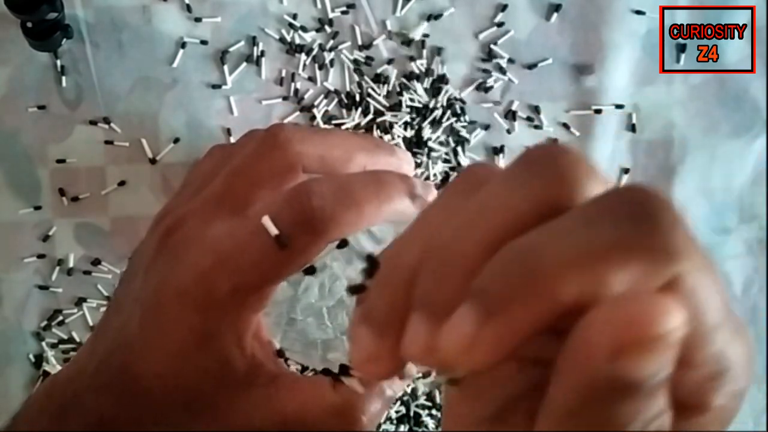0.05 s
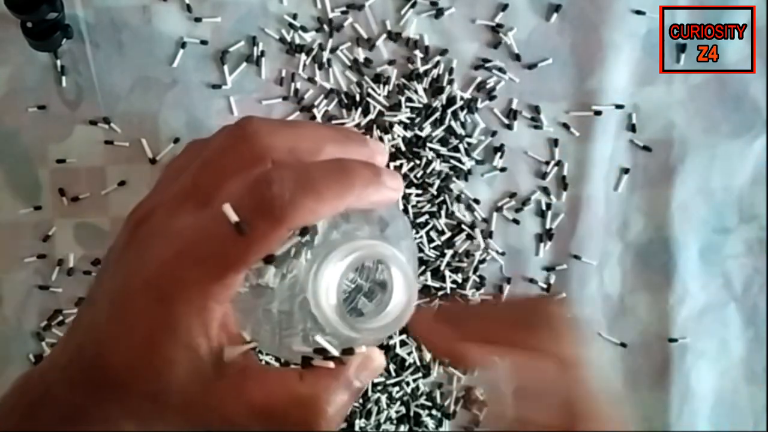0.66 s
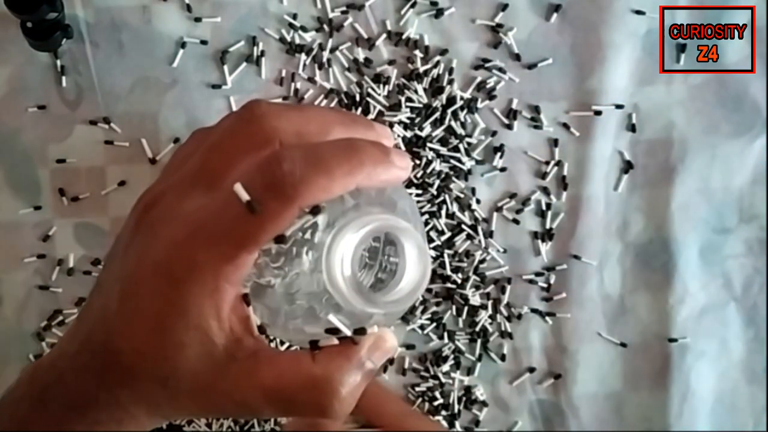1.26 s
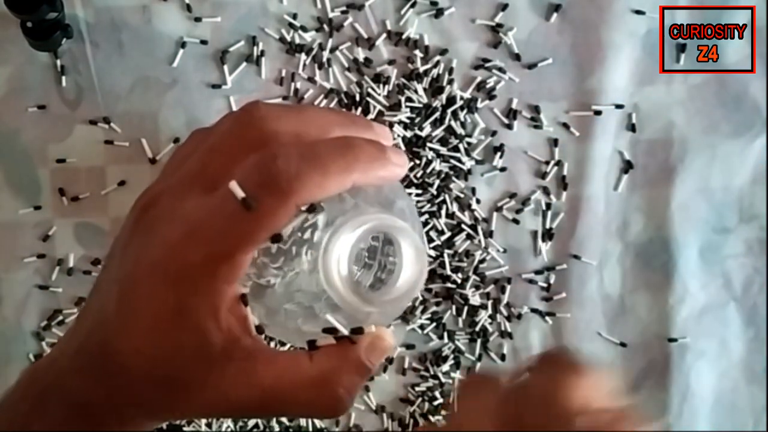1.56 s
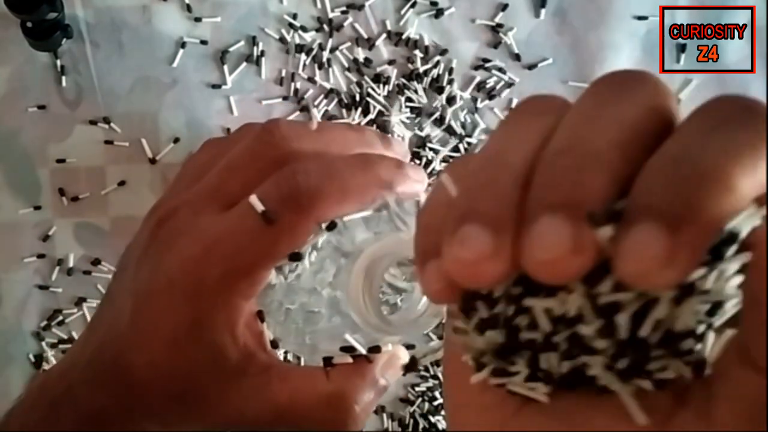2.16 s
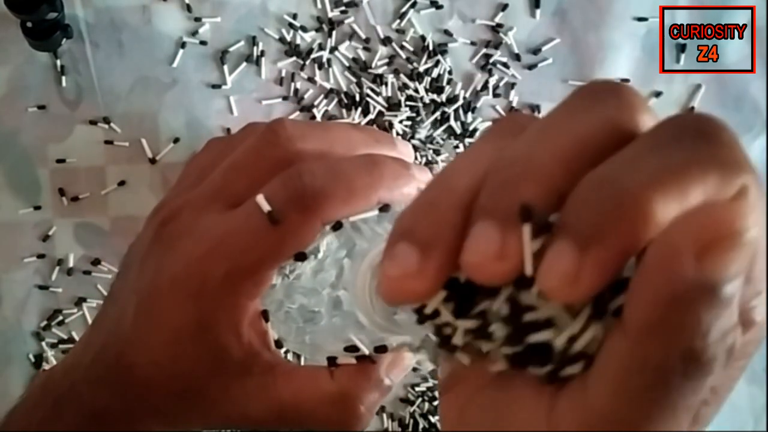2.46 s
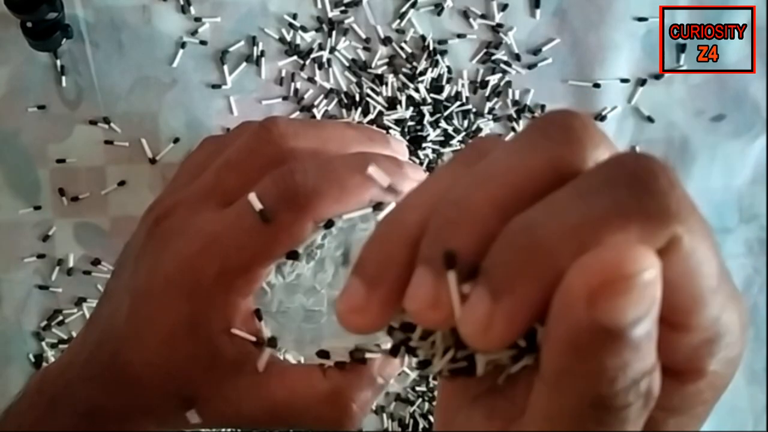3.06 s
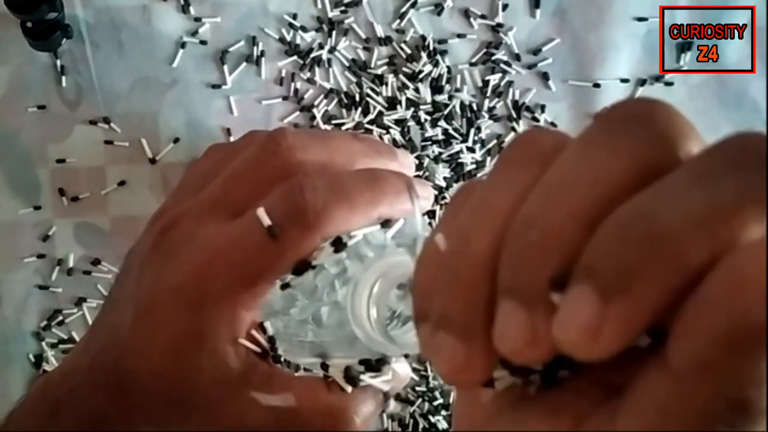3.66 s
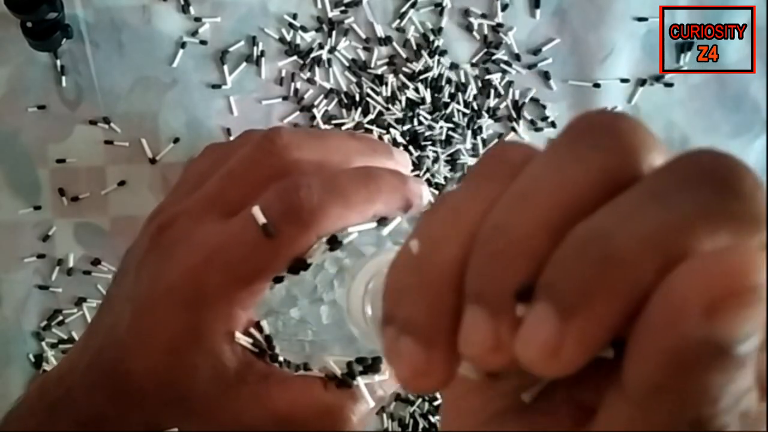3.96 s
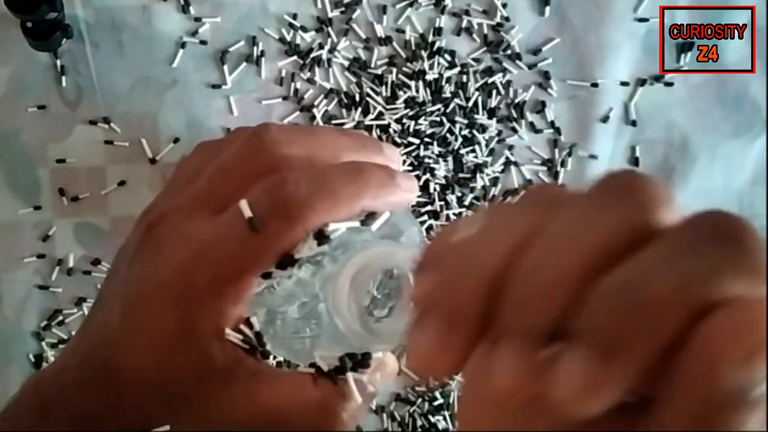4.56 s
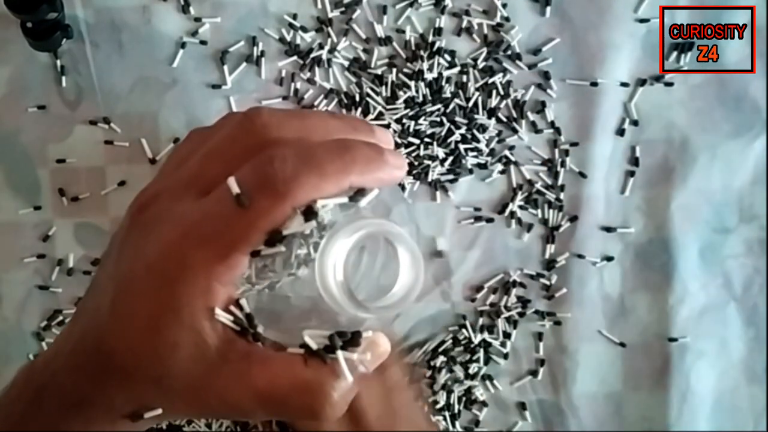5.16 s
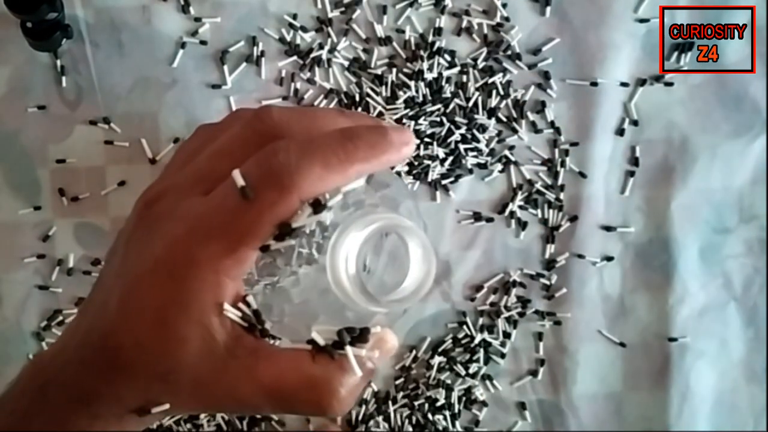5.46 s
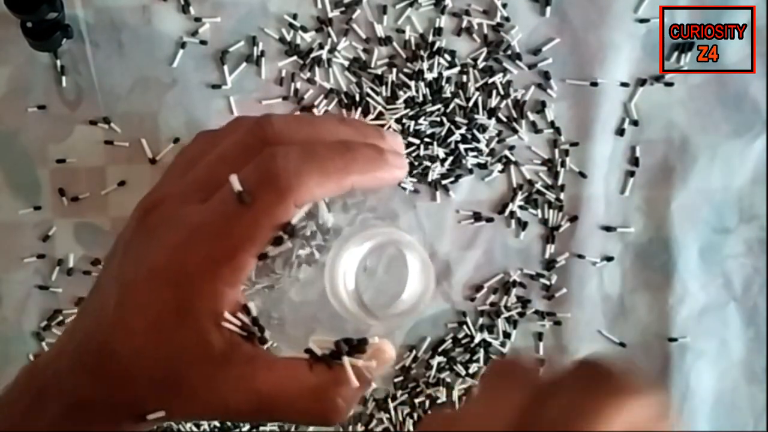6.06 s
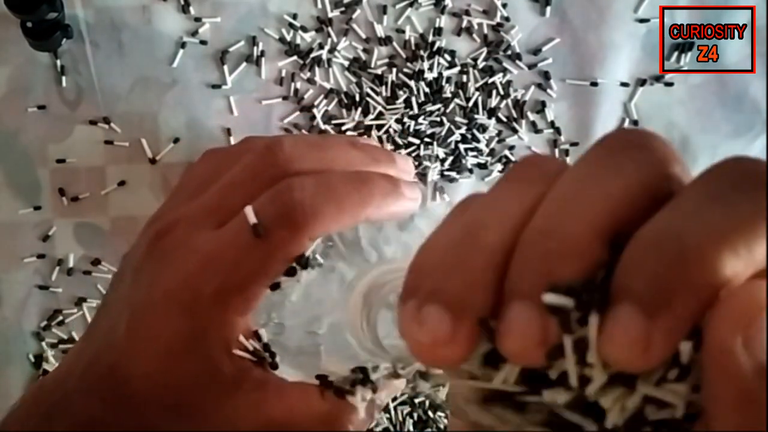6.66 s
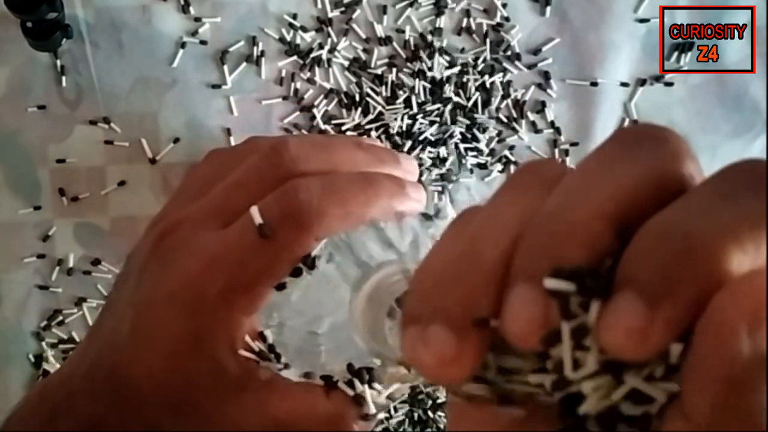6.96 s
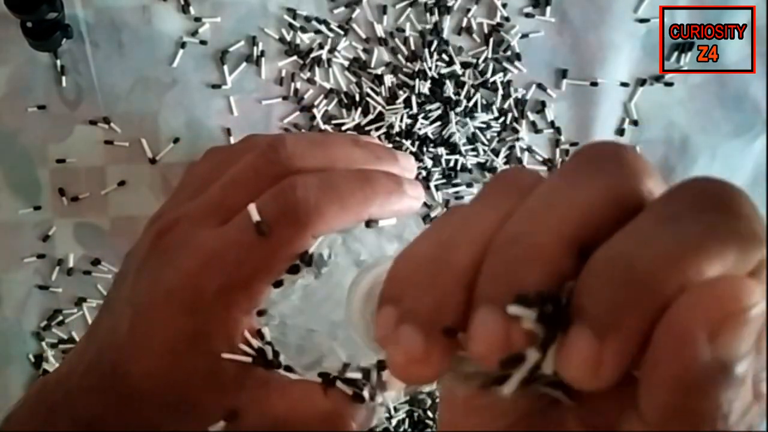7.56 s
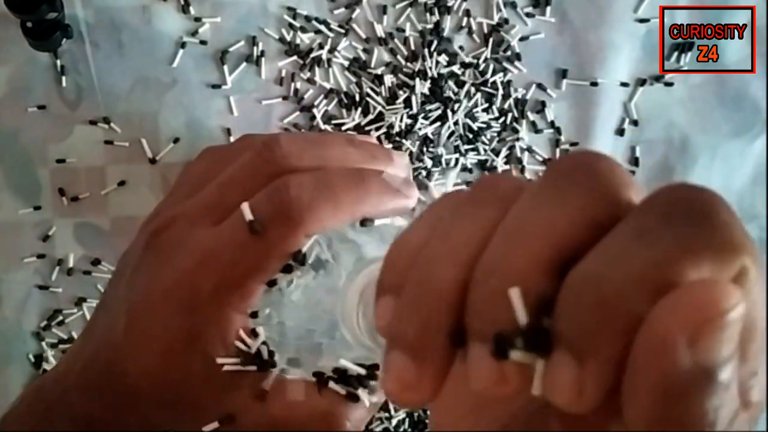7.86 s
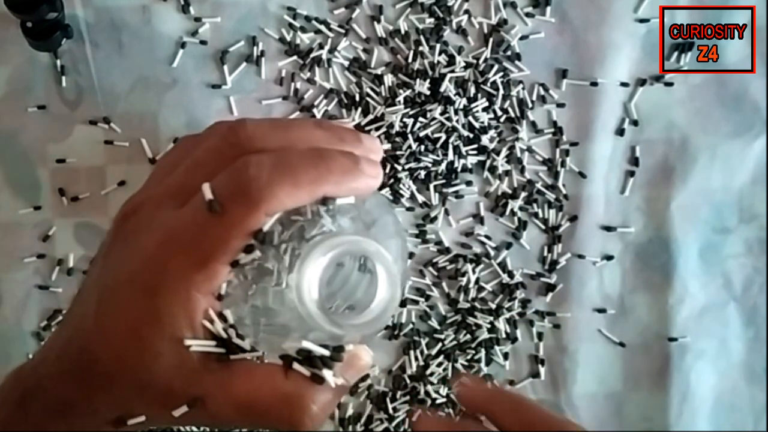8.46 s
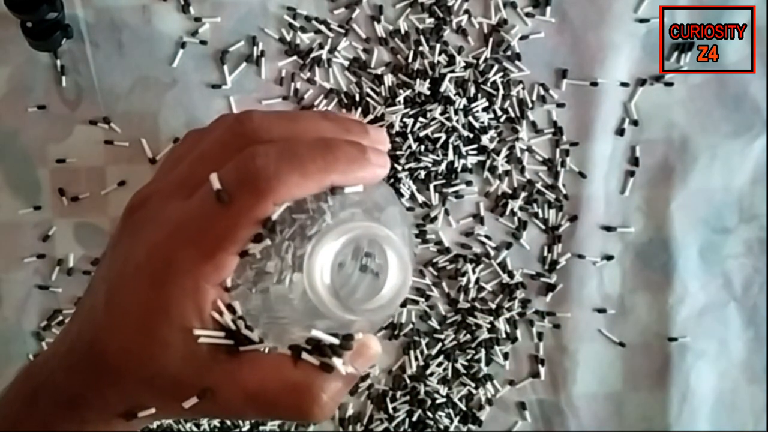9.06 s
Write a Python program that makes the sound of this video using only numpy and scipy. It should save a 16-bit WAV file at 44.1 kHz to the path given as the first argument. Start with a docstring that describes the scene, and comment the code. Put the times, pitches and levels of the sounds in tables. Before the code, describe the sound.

Small wooden matchsticks are already pouring into a plastic bottle, a bright, dense rattle with a faint hollow ring, thinning to stray ticks by about 0.7 seconds. Around 1 second fingers rustle through a heap of sticks on cloth and the hand softly bumps the table. After a lull with a few clicks, a second handful rattles down in uneven gushes from 2 seconds, stalls just after 3, and resumes from 3.6 to 4.6. Near 5 seconds comes another rustling scoop with a low thump, then a faint grating as the bottle shifts. Loose sticks crackle around 6 seconds, and a third pour runs from 6.6 to 8. The last sticks and a small clump click down by 8.5 seconds, leaving faint room hiss. The contacts are close and crisp, with the short echo of a bare room.

```python
"""A table in a bare, live room: a hand scoops cut matchsticks from a heap on a cloth and pours three
handfuls into a plastic bottle. Hundreds of tiny wooden contacts a second rattle on the plastic and
ring its walls; stray sticks tick and clumps drop in. Fingers rustle through the heap, the hand bumps
the table, the bottle drags with a low grating, and the room answers the sticks."""
import sys
import numpy as np
from scipy import signal
from scipy.fft import rfft, irfft, next_fast_len
from scipy.io import wavfile
from scipy.ndimage import uniform_filter1d, map_coordinates

SR = 44100
rng = np.random.default_rng(int(sys.argv[2]) if len(sys.argv) > 2 else 0)


def digitize_waveform(pressure):
    """Quantize a signal to 16-bit integers and store it at the path in sys.argv[1].

    Rows of a 2-D input are taken as channels; values are limited to [-1, 1].
    """
    field = np.atleast_2d(pressure).T
    bounded = np.clip(field, -1, 1)
    quanta = np.round(bounded * 32767).astype(np.int16)
    wavfile.write(sys.argv[1], SR, quanta)


N = 411446

# the fist is open and sticks stream out; the second handful stalls halfway: t/s, length/s, level/dB
POUR_CUES = [(-.25, 0.58, -27), (2.06, 1.015, -31.5), (3.6, 0.92, -32), (6.58, 1.42, -31)]
# the fingers shift and let an extra gush through: t/s, length/s, level/dB
GUSH_CUES = [(-.03, 0.027, -22.5), (.12, 0.051, -26), (.447, 0.033, -34.5), (2.105, 0.11, -35.5),
             (2.19, 0.026, -34.5), (2.25, 0.25, -32), (2.61, 0.025, -27), (2.745, 0.064, -33),
             (2.8, 0.025, -27.5), (2.85, 0.081, -27), (3.18, 0.17, -37.5), (3.385, 0.11, -40),
             (3.525, 0.22, -34), (3.724, 0.094, -25.5), (3.945, 0.04, -30), (4.14, 0.11, -32.5),
             (4.262, 0.024, -28), (4.397, 0.017, -24), (4.425, 0.018, -35), (6.615, 0.033, -38),
             (6.642, 0.033, -34), (6.692, 0.022, -30), (6.795, 0.061, -25.5), (6.92, 0.094, -29),
             (7.87, 0.033, -28.5), (7.025, 0.054, -26.5), (7.12, 0.083, -27), (7.332, 0.012, -26),
             (7.568, 0.023, -28), (7.7, 0.21, -29.5)]
# a hand leans on the bottle or the table: t/s, length/s, level/dB
PRESS_CUES = [(.02, 0.12, -49), (.3, 0.38, -59), (.91, 0.17, -56.5), (2.38, 0.18, -55), (2.74, 0.42, -53.5),
              (3.76, 0.2, -66), (4.4, 0.13, -57.5), (4.87, .12, -53), (5.02, 0.13, -53), (5.55, 0.059, -52)]
# stray sticks strike the plastic or each other: t/s, level/dB, centre f/Hz
TICK_CUES = [(0.1686, -28, 6700), (.3301, -34, 6250), (0.4486, -25, 5700), (0.5088, -34, 7700),
             (.5933, -32.5, 8200), (0.659, -37.5, 10100), (0.6843, -36.5, 7700), (0.8423, -38, 4000),
             (0.852, -40, 5600), (0.8582, -43, 4600), (0.9083, -37, 7000), (1.4852, -43, 8500),
             (1.517, -46, 7800), (1.696, -52, 4970), (1.7193, -32.5, 12100), (1.7331, -47, 10000),
             (1.735, -40, 9900), (1.8732, -31.5, 9900), (1.9075, -33, 9100), (1.9622, -36, 6500),
             (1.9669, -35, 5450), (2.0445, -38, 7850), (2.0813, -37, 5800), (2.1018, -25.5, 7830),
             (2.146, -27, 9000), (2.206, -30, 7600), (2.3166, -29, 7200), (2.569, -24.5, 10160),
             (2.6359, -32, 6860), (2.7714, -27, 7800), (3.0689, -33, 5950), (3.14, -34, 5560),
             (3.2276, -30, 6050), (3.2376, -28, 6800), (3.2477, -32, 7500), (3.3328, -37, 5900),
             (3.3956, -28, 6840), (3.4473, -33.5, 5950), (3.495, -37, 6400), (3.5401, -28.5, 6940),
             (3.558, -28, 6150), (3.6272, -36, 6400), (3.69, -31.5, 5070), (3.735, -23, 6350),
             (3.8982, -26, 5160), (3.9549, -31, 7300), (4.1182, -30, 6850), (4.1986, -30, 6670),
             (4.209, -26, 7800), (4.2675, -34, 7500), (4.278, -38, 8000), (4.3863, -25, 7100),
             (4.4, -26, 7300), (4.407, -24, 5930), (4.428, -28, 6300), (4.458, -24, 8600),
             (4.5433, -32.5, 7700), (4.554, -30, 7500), (4.6018, -26.5, 9330), (4.653, -40, 6650),
             (4.6775, -42, 5600), (4.8513, -39, 9200), (4.864, -40.5, 8250), (4.8857, -48, 5000),
             (4.9546, -36, 7700), (5.7922, -38.5, 6500), (5.867, -42, 7100), (6.0484, -45, 7900),
             (6.12, -47, 9000), (6.1274, -37, 8400), (6.1505, -38, 7600), (6.2238, -33, 7100),
             (6.2646, -34, 6460), (6.3278, -35.5, 8000), (6.3567, -37, 8540), (6.3818, -28, 6600),
             (6.4558, -33, 8600), (6.4899, -29, 6000), (6.5689, -37.5, 4500), (6.6104, -37, 5900),
             (6.644, -31, 6500), (6.6666, -34, 5840), (6.7015, -25, 7600), (6.769, -25, 6760),
             (6.7986, -25, 6940), (7.144, -27, 7500), (7.342, -26, 7000), (7.437, -31, 6400),
             (7.494, -27, 7600), (7.553, -27, 6900), (7.6797, -24, 8400), (7.682, -32, 7600),
             (7.7213, -23, 7500), (8.1177, -29, 7600), (8.179, -33, 9800), (8.2456, -52, 7300),
             (8.2706, -38, 9470), (8.399, -31, 7660), (8.4013, -27.5, 7550), (8.4353, -36, 8900)]
# clumps of sticks land together: t/s, level/dB, spread/s
CLUMP_CUES = [(.449, -41, .012), (.853, -49, .012), (1.9665, -38, 0.01), (2.101, -38, 0.0096),
              (3.3975, -34, .008), (3.5395, -42, 0.0095), (3.734, -37, .016), (4.399, -36, .025),
              (5.791, -50, .009), (6.224, -46, 0.014), (6.3835, -33.5, .008), (6.798, -28, 0.011),
              (8.401, -40, 0.011)]
# loose sticks shift in the fist or drop back on the heap: t/s, length/s, level/dB
SHIFT_CUES = [(.64, 0.062, -43.5), (1.9, 0.045, -53), (1.962, .13, -47.5), (6.125, .08, -52),
              (6.225, 0.13, -45.5), (6.385, 0.42, -44.5), (8.05, 0.12, -40.5), (8.397, 0.037, -34)]
# finger strokes through the heap: t/s, length/s, rustle level/dB, cloth level/dB
SCOOP_CUES = [(0.844, 0.22, -40, -52), (1.3, 0.5, -58.5, -65.5), (1.46, 0.023, -47, -87),
              (1.848, 0.045, -46, -59.5), (4.822, 0.028, -43, -51.5), (4.892, 0.051, -37, -51),
              (5.048, 0.22, -38, -55), (5.359, 0.22, -47, -55.5), (5.79, 0.06, -46, -60),
              (6.09, 0.21, -57, -61), (8.81, 0.1, -64, -85)]
# the hand bumps the table: t/s, level/dB, f/Hz, t60/s
BUMP_CUES = [(0.894, -42, 64.4, 0.39), (1.02, -51, 62, .55), (5.04, -39, 59.7, 0.5), (5.3, -56, 57, 1.2),
             (5.62, -53, 57.7, 0.35)]
# the bottle shifts on the cloth: t/s, length/s, level/dB
SLIDE_CUES = [(.92, 0.28, -67), (4.88, 0.1, -67), (5.53, 0.067, -58), (5.7, 0.098, -76)]

# sticks on plastic: f/Hz, level/dB
RATTLE_EQ = [(100, -12.5), (250, -11), (450, -14), (620, -8), (1000, -5), (1500, -6), (2150, -3.5),
             (2900, -4), (3700, -3.5), (4600, 0.3), (5700, -3), (7200, -0.8), (9400, -1.9), (11000, -7.5),
             (14500, -12.5), (16000, -26)]
# contacts on the bottle's rim: f/Hz, level/dB
RIM_EQ = [(300, -18.5), (1500, -5.5), (2600, 1), (4500, -4), (8500, 1.5), (11500, -7), (15500, -5)]
# room tone and hiss: f/Hz, level/dB
ROOM_TONE_EQ = [(15, -34), (25, -47), (53, 1.5), (102, -3.5), (120, -8.5), (190, -4), (217, -7),
                (373, -9.5), (405, -9), (1290, -17.5), (8830, -21.5), (14400, -26), (16000, -16.5)]
# one sharp contact: f/Hz, level/dB
TAP_EQ = [(200, -1), (600, 10.5), (1400, -0.5), (2500, 3), (5000, -0.5), (10000, -1.5), (15500, -10.5)]
# sticks against sticks: f/Hz, level/dB
LOOSE_EQ = [(200, -9.5), (700, -6), (1800, -7.5), (2600, -1.5), (4200, 0), (6000, -2), (9000, -0.5),
            (12000, -5), (15500, -14)]
# sticks on cloth: f/Hz, level/dB
HEAP_EQ = [(100, -9), (250, -5), (430, -7.5), (620, -1), (1000, -4), (1700, -5.5), (4500, -2), (9000, -2),
           (13000, -8.5), (16000, -19)]
# the bottle's base on the cloth: f/Hz, level/dB
GRATING_EQ = [(40, -20), (110, 6), (170, 7), (290, -3), (420, -21), (1000, -40), (4000, -90)]
# tone of the direct path: f/Hz, level/dB
DIRECT_EQ = [(400, -11), (1500, -3), (4200, 0.5), (8000, -1), (14000, 2)]
# resonances of the bottle's thin walls and the air inside: f/Hz, width/Hz, level/dB
BOTTLE_MODES = [(326.6, 18, 4.5), (421, 25, 1.5), (500, 37, 4), (591, 17, 6.5), (642, 26, 2),
                (768, 52, 2.5), (842, 29, -2), (902, 26, -1), (1033, 50, 0), (1235, 43, 4.5),
                (1380, 61, -10), (1713, 12, -1), (2146, 48, 7.5)]
# low resonances of bottle, table and room: f/Hz, width/Hz, level/dB
LOW_MODES = [(59, 20, -7), (133.9, 3.7, 12), (189.7, 5.6, 1), (237, 5.8, -6), (323, 5.4, 1)]
# the room's reverb time: f/Hz, t60/s
ROOM_DECAY = [(200, 1), (1000, 0.82), (4000, 0.51), (8000, 0.38), (14000, 0.41)]
# left-right likeness of diffuse sound: f/Hz, correlation
COHERENCE = [(150, 0.79), (350, 0.77), (700, 0.14), (1500, 0)]

OVERTONE = 2.76  # a free stick's second bending mode over its first
STICK_T60_S = 0.013  # ring of a stick that lies against others
SNAP_ATTACK_S, SNAP_RELEASE_DB_PER_S = 0.0011, 291  # fast envelope of gushes and shifts


def amp(db):
    return 10 ** (np.asarray(db) / 20)


def unit(x):
    return x / np.sqrt(np.mean(x ** 2) + 1e-20)


def curve(points, hz):
    """Read (f/Hz, value) points along a log frequency axis."""
    f, value = np.transpose(points)
    return np.interp(np.log(hz + 1), np.log(f + 1), value)


def filtered(x, response):
    """Apply a complex frequency response."""
    n = x.shape[-1]
    padded = next_fast_len(n + 8192, True)
    return irfft(rfft(x, padded) * response(np.fft.rfftfreq(padded, 1 / SR)), padded)[..., :n]


def eq(x, tone):
    """Colour x with an EQ curve."""
    return filtered(x, lambda hz: amp(curve(tone, hz)))


def crossover(x, tone, edge_hz):
    """EQ a stream and split it into a bright and a dull band, each of rms 1."""
    low = lambda hz: 1 / (1 + (hz / edge_hz) ** 6)
    bright, dull = filtered(x, lambda hz: amp(curve(tone, hz)) * np.array([1 - low(hz), low(hz)]))
    return unit(bright), unit(dull)


def resonances(modes, f):
    """Complex response of a bank of resonators."""
    return sum(amp(db) * width * f / (width * f - 1j * (hz * hz - f * f)) for hz, width, db in modes)


def diffuse(a, b, hz):
    """Spread two unrelated spectra in stereo: narrow in the bass, wide above."""
    angle = np.arccos(np.clip(curve(COHERENCE, hz), -1, 1)) / 2
    mid, side = np.cos(angle) * a, np.sin(angle) * b
    return np.array([mid + side, mid - side])


def placed(times, grains):
    """Mix the rows of grains, each starting at its time."""
    at = (np.abs(times) * SR).astype(int)[:, None] + np.arange(grains.shape[1])
    return np.bincount(at.ravel(), grains.ravel(), N)[:N]


def swells(cues, attack_s, release_db_per_s):
    """Envelope of (t/s, length/s, level/dB) cues: each rises, holds and dies away; powers add."""
    t = np.arange(0, N + 64, 64) / SR
    start, length, db = np.transpose(cues)[:, :, None]
    attack = np.clip((t - start) / attack_s, 0, 1)
    release = amp(db - release_db_per_s * np.maximum(t - start - length, 0))
    return np.interp(np.arange(N) / SR, t, np.linalg.norm(attack * release, axis=0))


def cracks(centre_hz, t60, octaves, size=256):
    """Dry wooden contacts of equal energy: brief noise bursts, each a broad band around its centre."""
    decay = np.roll(np.exp(-np.log(1000) * np.arange(size) / SR / t60), size // 16)
    spectrum = rfft(rng.standard_normal((len(centre_hz), size)) * decay)
    flattened = spectrum / np.abs(spectrum) ** 0.8
    distance = np.log2((np.fft.rfftfreq(size, 1 / SR) + 1) / centre_hz[:, None])
    burst = irfft(flattened * np.exp(-0.5 * (distance / octaves) ** 2))
    return burst / np.linalg.norm(burst, axis=1, keepdims=True)


def stick_rings(hz, overtone_db, size=1024):
    """Struck sticks of equal energy: each rings briefly at its pitch and its overtone."""
    t = np.arange(size) / SR
    phase = 2 * np.pi * hz[:, None] * t
    fade = np.exp(-np.log(1000) * t / STICK_T60_S)
    ring = np.sin(phase) * fade + amp(overtone_db) * np.sin(OVERTONE * phase) * fade ** 1.08
    return ring / np.linalg.norm(ring, axis=1, keepdims=True)


def jostle(per_s, scatter_db, flurry_db, t60):
    """A levelled bed of random contacts, some harder than the rest, with brief louder flurries."""
    flurries = rng.standard_normal(900)
    when, force = rng.standard_normal((int(per_s * N / SR), 2)).T
    position = (when * SR) % 1  # wraps to an even spread over the scene
    flurry = map_coordinates(flurries, [position * (len(flurries) - 1)])
    db = scatter_db * np.minimum(force, 2) + flurry_db * flurry
    clicks = cracks(np.full(len(db), SR / 10), t60, octaves=40)
    bed = placed(position * N / SR, amp(db)[:, None] * clicks)
    return bed / np.sqrt(np.abs(uniform_filter1d(bed ** 2, size=3000)) + 1e-9)


def flow():
    """The stream builds as the fingers open and thins as they empty, with gushes on top."""
    steady = swells(POUR_CUES, attack_s=0.28, release_db_per_s=82)
    return np.hypot(steady, swells(GUSH_CUES, SNAP_ATTACK_S, SNAP_RELEASE_DB_PER_S))


def strokes():
    """Two envelopes: the fingers stirring the heap, and rubbing the cloth."""
    start, length, *levels = np.transpose(SCOOP_CUES)
    return [swells(np.transpose([start, length, db]), attack_s=0.028, release_db_per_s=87)
            for db in levels]


def pouring(bunch_db=1.17, bunches_per_s=38):
    """Sticks stream from the fist in small bunches, rattle in the bottle and make it ring."""
    contacts = jostle(per_s=700, scatter_db=3, flurry_db=2, t60=0.0015)
    bright, dull = crossover(contacts, RATTLE_EQ, edge_hz=2240)
    ring = unit(filtered(contacts, lambda f: resonances(BOTTLE_MODES, f)))
    flutter = map_coordinates(rng.uniform(-1.27, 1, size=1024), [np.arange(N) * bunches_per_s / SR])
    bunches = unit(amp(bunch_db * np.sqrt(3) * flutter))
    return flow() * bunches * (amp(-5) * bright + amp(-3) * clatter() + amp(-20) * dull + amp(-23) * ring)


def clatter(per_s=230, centre_hz=3000, octaves=0.419, scatter_db=1, bounce_s=0.016, loss_db=3, hits=3):
    """Single sticks stand out of the stream: each bounces, softer each time, at the same pitch."""
    when, force, pitch, *flights = rng.standard_normal((int(per_s * N / SR), 3 + hits)).T
    rings = stick_rings(np.clip(centre_hz * 2 ** (octaves * pitch), 1500, 5600), overtone_db=4.5)
    start = when * SR  # wraps below to an even spread over the scene
    out = np.zeros(N)
    for bounce, flight in enumerate(flights):
        gain = amp(scatter_db * np.minimum(force, 1.5) - loss_db * bounce)
        out += placed(start % (N / SR), gain[:, None] * rings)
        start = start + bounce_s * np.exp(flight / 2)
    return unit(eq(out, RATTLE_EQ))


def rim_glances(per_s=260, scatter_db=0.5, centre_hz=6300, octaves=0.59, full_flow_db=-28.5):
    """Sticks glance off the rim, close and dry; a thin stream breaks up into single ringing ticks."""
    when, force, pitch, luck = rng.random((int(per_s * N / SR), 4)).T
    strength = flow()[(when * N).astype(int)]
    chance = np.clip((strength / amp(full_flow_db)) ** 0.55, 0.02, 1)
    accent = unit(amp(scatter_db * np.abs(np.log(force + 0.02))))
    gain = (luck < chance) * strength * np.sqrt(SR / per_s / chance) * accent
    hz = centre_hz * 2 ** (octaves * (2 * pitch - 1))
    snap = amp(-2.5) * cracks(hz, t60=0.0038, octaves=0.64, size=512)
    ring = amp(2.5) * stick_rings(hz / OVERTONE, overtone_db=4, size=512)
    return amp(-10) * eq(placed(when * N / SR, gain[:, None] * (snap + ring)), RIM_EQ)


def hollow_hum(growth_db_per_db=0.51, low_cut_hz=47):
    """Moving sticks and pressing hands keep the low resonances of bottle, table and room humming."""
    stirred = amp(-42.5) * np.hypot(flow(), strokes()[0]) ** growth_db_per_db
    pressed = swells(PRESS_CUES, attack_s=0.026, release_db_per_s=75)
    low_cut = lambda f: f ** 8 / (f ** 8 + low_cut_hz ** 8)
    mid, side = filtered(rng.standard_normal((2, N)), lambda f: resonances(LOW_MODES, f) * low_cut(f))
    return np.hypot(stirred, pressed) * unit(mid + amp(-16) * np.array([side, -side]))


def room_tone(level_db=-62):
    """A faint, steady bed of room noise and hiss."""
    padded = next_fast_len(N, True)
    hz = np.fft.rfftfreq(padded, 1 / SR)
    a, b = rfft(rng.standard_normal((2, padded)))
    spectrum = diffuse(a, b, hz) * amp(curve(ROOM_TONE_EQ, hz))
    return amp(level_db) * unit(irfft(spectrum, padded)[:, :N])


def stray_ticks():
    """A stray stick snaps down with one end, an instant later with the other, and rings briefly."""
    start, db, hz = np.transpose(TICK_CUES)
    gain = (amp(db) * np.sqrt(0.003 * SR))[:, None]  # the energy of 3 ms at that level
    first_end = placed(start, gain * cracks(hz, t60=0.0012, octaves=0.87))
    gap_s = rng.uniform(0.0006, 0.002, len(start))
    second_end = placed(start + gap_s, gain * cracks(hz, t60=0.004, octaves=0.85))
    ring = placed(start, gain * stick_rings(hz / OVERTONE, overtone_db=8.5))
    return eq(amp(-1.5) * first_end + amp(-5) * second_end + amp(-8) * ring, TAP_EQ)


def falling_clumps(sticks=10, fall_db=9, scatter_db=0.89, centre_hz=5800):
    """A clump lands as a quick run of contacts, the first sticks hardest."""
    start, db, spread = np.transpose(CLUMP_CUES)[:, :, None]
    lateness = (np.arange(sticks) + rng.uniform(-0.4, 0.4, (len(start), sticks))) / sticks
    shares = amp(scatter_db * rng.standard_normal(lateness.shape) - fall_db * lateness)
    shares /= np.linalg.norm(shares, axis=1, keepdims=True)
    gain = amp(db) * np.sqrt(0.012 * SR) * shares  # the energy of 12 ms, shared out
    contacts = cracks(np.full(lateness.size, centre_hz), t60=0.0027, octaves=1)
    return eq(placed((start + spread * lateness).ravel(), gain.reshape(-1, 1) * contacts), TAP_EQ)


def shifting_sticks():
    """Loose sticks slip over one another: a sparse, dry crackle with none of the bottle's ring."""
    contacts = jostle(per_s=360, scatter_db=3, flurry_db=3, t60=0.0021)
    envelope = swells(SHIFT_CUES, SNAP_ATTACK_S, SNAP_RELEASE_DB_PER_S)
    return amp(-1.5) * envelope * unit(eq(contacts, LOOSE_EQ))


def scooping():
    """Fingers push through the heap: finer, softer contacts over the rub of the cloth."""
    rustle, cloth = strokes()
    contacts = jostle(per_s=1000, scatter_db=2.5, flurry_db=0.5, t60=0.0022)
    bright, dull = crossover(contacts, HEAP_EQ, edge_hz=4350)
    return amp(-4.5) * rustle * bright + amp(4) * cloth * dull


def table_bumps(attack_s=0.003):
    """The table booms softly under the hand: one low, dying tone a bump."""
    out = np.zeros(N)
    for start, db, hz, t60 in BUMP_CUES:
        age = np.maximum(np.arange(N) / SR - start, 0)
        envelope = amp(db - 60 * age / t60) * (1 - np.exp(-age / attack_s))
        out += envelope * np.sin(2 * np.pi * hz * age)
    return out


def bottle_slides():
    """The bottle's base drags over the cloth and the table under it with a low grating."""
    grating = unit(eq(rng.standard_normal(N), GRATING_EQ))
    return swells(SLIDE_CUES, attack_s=0.035, release_db_per_s=113) * grating


def direct_path(x, lag_samples=2.9, scatter_samples=2.2, block=400):
    """Contacts come from scattered spots, mostly on the right: the left side lags by a jumping delay."""
    block_lags = np.round(lag_samples + scatter_samples * rng.standard_normal(N // block + 1))
    lags = np.repeat(block_lags, block)[:N].astype(int)
    left = x[np.clip(np.arange(N) - lags, 0, N - 1)]
    return np.array([left, x])


def room_reverb(x, sections=24, attack_s=0.0017):
    """The walls' answer dies faster in the treble; a fresh tail per section shifts it as things move."""
    hz = np.fft.rfftfreq(256, 1 / SR)[:, None]
    t = np.arange(0, 0.6, 128 / SR)
    t60 = curve(ROOM_DECAY, hz)
    fade = np.exp(-np.log(1000) * t / t60) / np.sqrt(t60) * (1 - np.exp(-t / attack_s))
    out = np.zeros((2, N + SR))
    for at in np.array_split(np.arange(N), sections):
        a, b = rng.standard_normal((2, len(hz), 2 * len(t))).view(complex)
        tail = signal.istft(diffuse(a, b, hz) * fade)[1]
        wet = signal.fftconvolve(x[at][None], tail / np.linalg.norm(tail[0]), axes=1)
        out[:, at[0]:at[0] + wet.shape[1]] += wet
    return out[:, :N]


def scene():
    """The mix: sharp hits sit up front, the streams are mostly reverb, the low layers stay dry."""
    streams = pouring() + scooping() + shifting_sticks()
    ticks, clumps = stray_ticks(), falling_clumps()
    near = direct_path(eq(amp(-4.5) * streams + amp(2) * ticks + clumps, DIRECT_EQ) + rim_glances())
    far = room_reverb(amp(-0.57) * streams + amp(0.7) * ticks + amp(2.5) * clumps)
    return near + far + hollow_hum() + table_bumps() + bottle_slides() + room_tone()


def record(dry):
    """Master EQ: roll off the rumble below 42 Hz and cut everything above 15.9 kHz."""
    rumble_cut = signal.butter(3, 42, "high", fs=SR, output="sos")
    return filtered(signal.sosfilt(rumble_cut, dry), lambda hz: hz < 15900)


dry = scene()
out = record(dry)
digitize_waveform(out)
```